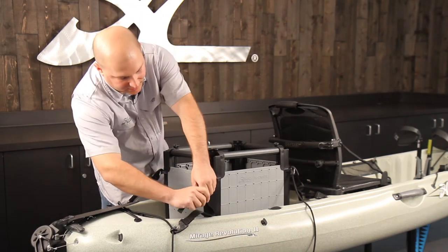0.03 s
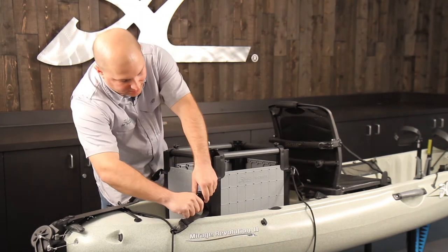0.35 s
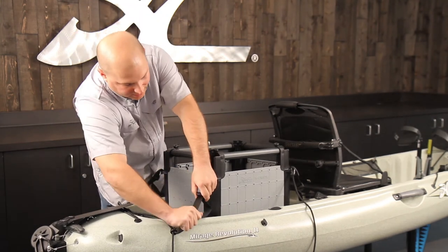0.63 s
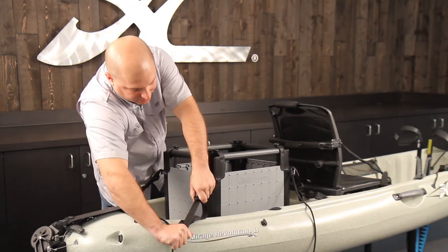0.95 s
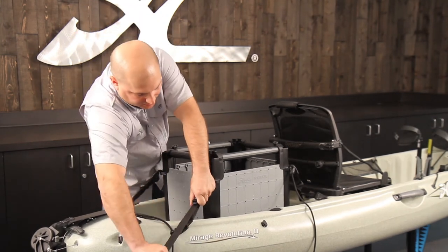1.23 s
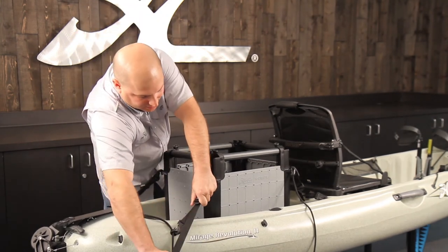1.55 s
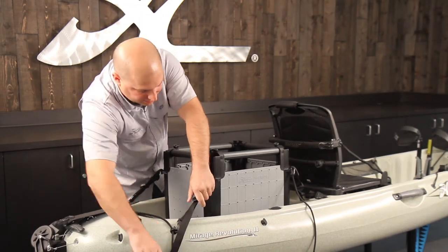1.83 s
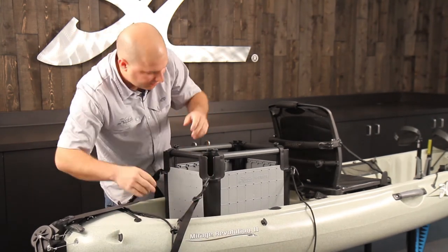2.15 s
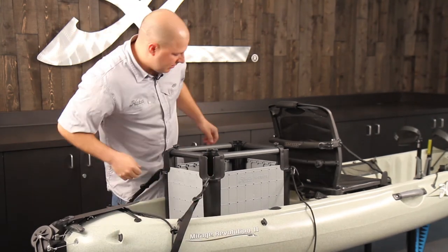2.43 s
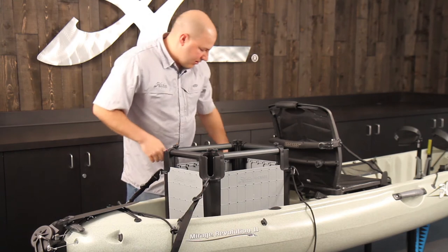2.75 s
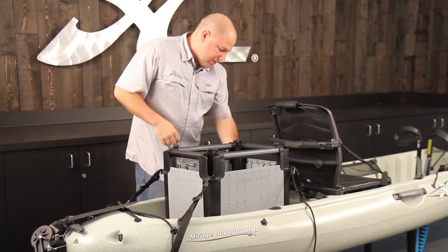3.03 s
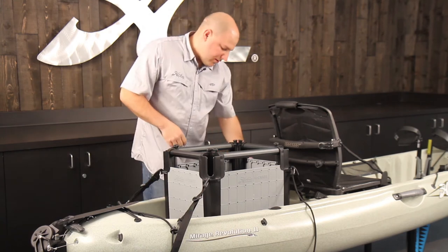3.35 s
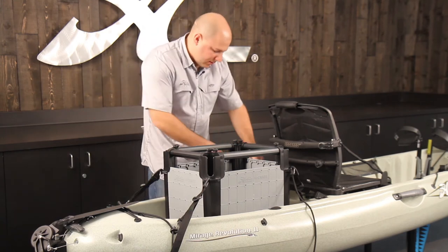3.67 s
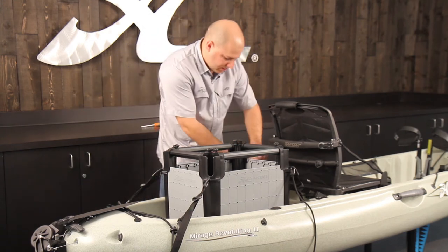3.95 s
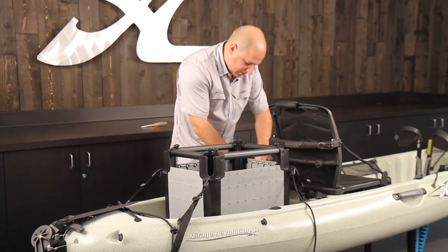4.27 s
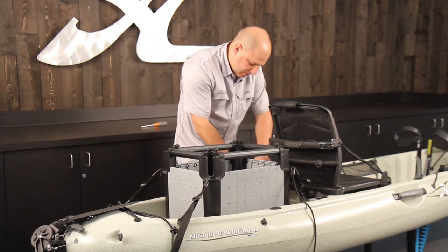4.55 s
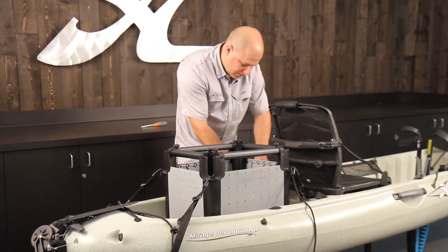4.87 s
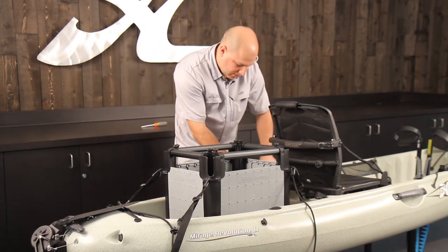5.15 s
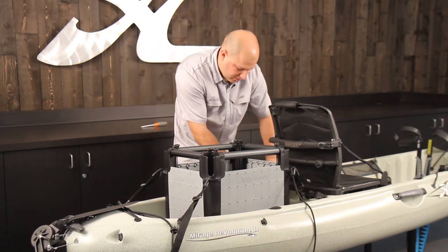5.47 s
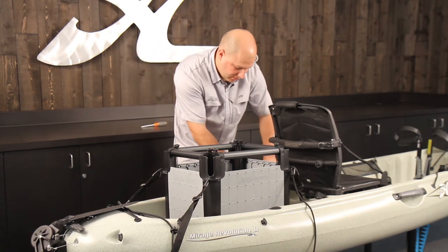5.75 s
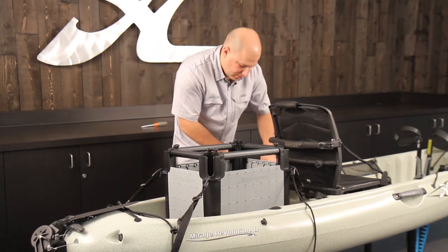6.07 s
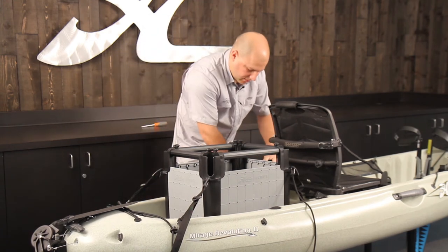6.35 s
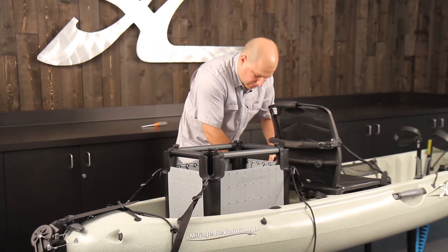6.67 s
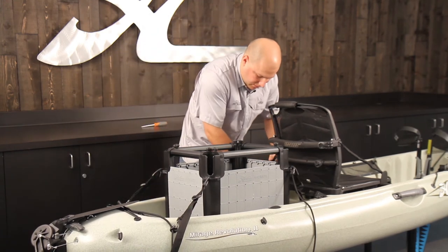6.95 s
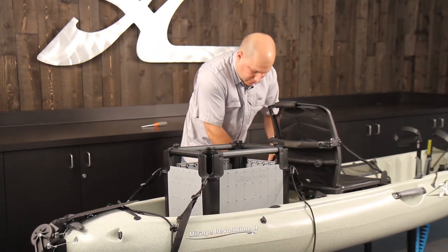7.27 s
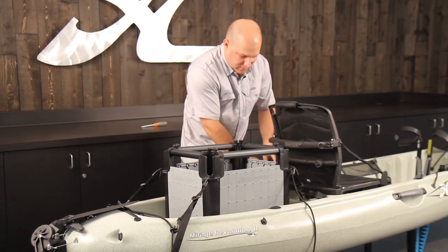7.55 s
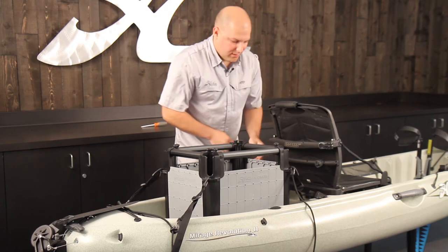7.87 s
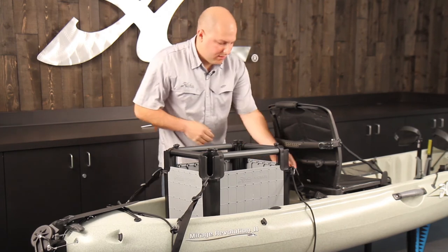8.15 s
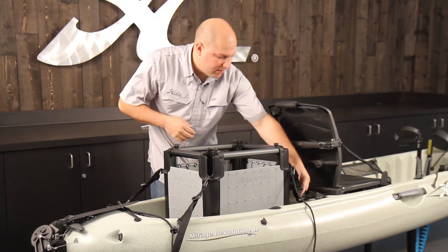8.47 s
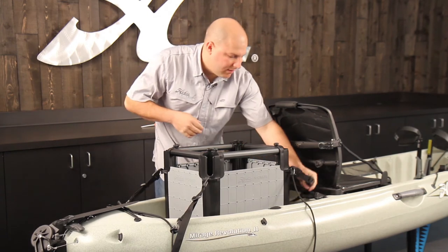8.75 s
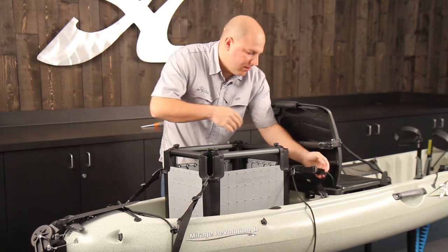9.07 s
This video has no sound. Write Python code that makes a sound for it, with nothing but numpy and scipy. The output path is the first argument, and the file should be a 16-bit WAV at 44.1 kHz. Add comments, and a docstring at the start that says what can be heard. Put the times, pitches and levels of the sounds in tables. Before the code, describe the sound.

Webbing straps rasp tight around a plastic crate on a hollow kayak, with knocks, dull drumming and one sharp clip snap.

```python
"""Strapping a crate to a kayak

Webbing catches and slips through its buckle, lashing a plastic crate to a hollow hull that drums
under the load. Hands knock the crate, snap a clip home, pull a second strap and rummage against
the hull. A shirt rustles close by; a quiet, ventilated workshop answers."""
import sys
import numpy as np
from scipy import signal
from scipy.fft import rfft, irfft, next_fast_len
from scipy.io import wavfile
from scipy.ndimage import uniform_filter1d, map_coordinates

SR = 44100
rng = np.random.default_rng(int(sys.argv[2]) if len(sys.argv) > 2 else 0)


def wav_out(sig):
    """Save sig, one row per channel (or a flat mono array), as 16-bit PCM at SR to the path in sys.argv[1]."""
    wavfile.write(sys.argv[1], SR, np.round(np.clip(np.atleast_2d(sig).T, -1, 1) * 32767).astype(np.int16))


N = 401743
LEAD_S = 0.2  # run-up of a stroke

# Resonances. Each row: centre in Hz, width in Hz, gain in dB.
HULL_MODES = [(34, 30, -6), (79, 12, 4), (125, 16, -3), (186, 30, -10), (247, 16, -3)]
BUCKLE_MODES = [(2112, 64, -8.5), (2670, 140, -1.5), (2970, 140, -2), (3580, 94, 3), (3920, 49, 0.5),
                (4330, 140, -2), (5300, 360, -3)]
# Spectrum of plucked webbing fibres. Each row: frequency in Hz, gain in dB.
FIBRE_SPECTRUM = [(1290, -26.5), (2200, -9), (3000, 0.5), (3950, 3), (5300, -3.5), (7100, -2), (9000, -6.5),
                  (11400, -11), (13300, -12.5), (15800, -8)]


def straps():
    """The weave catches and slips in the buckle: it rasps, hisses, shakes the hull and rings the crate."""
    # Each row: start in s, hold in s, full levels in dB of rasp, hull flex, hull wall, crate frame and
    # hiss, swell in dB, hiss swell in dB, release t60 in s, catches per s, catch depth in dB.
    pulls = [(0.73, 0.075, -39.5, -46, -29, -32, -48.5, 23, 4, 0.08, 180, 5.5),
             (1.052, 0.092, -44.5, -36.5, -36, -39.5, -45.5, 5.5, 10, 0.17, 110, 11),
             (4.853, 0.034, -57.5, -61, -74, -60, -66.5, 5.5, -5, 0.18, 120, 20),
             (4.934, 0.0029, -51, -67, -73, -48.5, -64, 9, -2, 0.079, 99, 3.5),
             (5.058, 0.018, -55, -67, -74, -57, -65, 4, -3, 0.16, 110, 14),
             (5.118, 0.069, -43, -44, -50, -35, -45, 2.5, 1, 0.12, 85, 4),
             (5.393, 0.028, -37.5, -48, -51, -41, -64, 16.5, -14.5, 0.066, 82, 8.5),
             (6.659, 0.036, -49.5, -58, -58, -50.5, -76, 2, 12, 0.098, 80, 0)]
    # Hull wall and crate frame. Each row: centre in Hz, width in Hz, gain in dB.
    wall_modes = [(186, 24, -6), (222, 16, -6), (246, 22, 3), (448, 26, -9), (530, 36, -2), (604, 30, -7)]
    frame_modes = [(335, 24, -12), (480, 22, -7), (530, 24, -5), (820, 26, -9), (885, 35, -5),
                   (953, 42, -1), (1035, 40, -8)]
    # Each row: frequency in Hz, gain in dB.
    rasp_spectrum = [(88, -11.5), (150, -4), (250, 5), (380, 4.5), (540, 12), (720, 8.5), (950, -7.5),
                     (1250, -12.5), (1450, -5), (2010, -20), (3000, -38), (3900, -23.5), (6600, -120)]
    attack_s = 0.0095
    rasp_gain, flex_gain, wall_gain, frame_gain, hiss_gain = np.zeros((5, N))
    for (start_s, hold_s, rasp_db, flex_db, wall_db, frame_db, hiss_db,
         swell_db, hiss_swell_db, t60_s, catches_per_s, catch_db) in pulls:
        catches = ratchet(catches_per_s, catch_db)
        crate_catches = unit(catches ** 0.8)  # the heavy crate follows less than the fibres do
        tension = stroke(hold_s, attack_s, t60_s, swell_db)
        at_s = start_s - LEAD_S
        add(rasp_gain, at_s, amp(rasp_db) * tension * crate_catches)
        add(flex_gain, at_s, amp(flex_db) * tension)
        add(wall_gain, at_s, amp(wall_db) * tension)
        add(frame_gain, at_s, amp(frame_db) * tension)
        add(hiss_gain, at_s, amp(hiss_db) * stroke(hold_s, attack_s, t60_s, hiss_swell_db) * catches)
    weave = slips(per_s=2000, spread_db=1)
    tugs = slips(per_s=3000, spread_db=1)
    plucks = weave + slips(per_s=4500, spread_db=0.5)  # each slip of the weave also plucks fibres
    fibres = unit(patchy(coloured(plucks, FIBRE_SPECTRUM), depth_db=2))
    hiss = unit(fibres + amp(-11) * unit(resonate(tugs, BUCKLE_MODES)))
    rasp = unit(coloured(weave, rasp_spectrum))
    flex = unit(band(slips(per_s=500, spread_db=2), 37, 600))  # coarse slips shake the hull's skin
    wall = unit(resonate(tugs, wall_modes))
    frame = unit(resonate(weave, frame_modes))
    return rasp_gain * rasp + flex_gain * flex + wall_gain * wall + frame_gain * frame + hiss_gain * hiss


def ratchet(per_s, depth_db):
    """Gain of ribs crossing the buckle's teeth: each lets go at once and fades until the next; rms 1."""
    spacing_s = np.exp(0.39 * rng.standard_normal(400)) / per_s
    ribs = np.interp(np.arange(SR) / SR, np.cumsum(spacing_s), np.arange(len(spacing_s)))
    return unit(amp(-depth_db * (ribs % 1)))


def clip_snap():
    """The clip springs home with a bright crack and rings briefly; its rail rings on faintly."""
    # Each row: start in s, level in dB.
    snaps = [(3.738, -10)]
    # Each row: frequency in Hz, gain in dB.
    crack_spectrum = [(120, -71.5), (200, -38.5), (322, -13), (447, -13.5), (517, -27), (610, -13.5),
                      (1180, -8), (1830, -18), (2680, -12.5), (2990, -4.5), (3730, -15), (4640, -18),
                      (8030, -35.5), (10000, -29.5), (15800, -55.5)]
    # Each row: frequency in Hz, gain in dB, t60 in s.
    clip_modes = [(462, 0, .08), (830, -10, .06), (915, -10, .07), (997, -8, .06), (1130, -7, .07),
                  (1207, -4, .07), (1350, -11, .08), (1620, -17, .05), (1900, -16, .04), (2120, -15, .05),
                  (2530, -13, .04), (2930, -5, .04), (3040, -8, .035), (3360, -14, .04)]
    rail_modes = [(283, -6, .25), (440, 3, .25), (530, -2, .25), (600, -3, .25), (915, -7, .31),
                  (1136, -5, .29), (1206, -6, .37), (1351, 2, .24), (1685, -12, .37), (2116, -16, .45),
                  (2410, -21, .35), (2545, -23, .3), (2910, -15, .35), (2975, -16, .3), (3774, -25, .39),
                  (3908, -11, .3), (4409, -23, .37), (4678, -21, .33), (5087, -23, .39)]
    attack_s, t60_s = 0.0025, 0.029
    out, t = np.zeros(N), np.arange(SR // 2) / SR
    for start_s, db in snaps:
        envelope = amp(-60 * t / t60_s) * (1 - np.exp(-t / attack_s))
        crack = amp(-16) * burst(coloured(rng.standard_normal(len(t)) * envelope, crack_spectrum))
        clip = amp(-12.5) * ringing(t, clip_modes)
        rail = amp(-26.5) * ringing(t, rail_modes)
        add(out, start_s, amp(db) * (crack + clip + rail))
    return out


def crate_knocks():
    """Buckles and hooks knock the crate, each spot at its own pitch; softer contacts lose more treble."""
    # Each row: start in s, clack level in dB, thud over clack in dB, softness as crack loss in dB,
    # chatter t60 in s, thud pitch in Hz, clack pitch in Hz.
    knocks = [(0.706, -37, -28, 16, .06, 550, 1140), (0.7128, -25.5, 0, 15, 0.043, 557, 1170),
              (0.797, -32.5, -16, 27, 0.058, 510, 1020), (0.809, -33, -2, 36, 0.037, 450, 1000),
              (0.8823, -31, -4.5, 17, 0.032, 534, 1250), (1.134, -33, 2.5, 28, 0.077, 500, 900),
              (1.595, -51, 2, 13, 0.13, 500, 1170), (2.485, -64, 15, -4, 0.023, 305, 1110),
              (2.783, -60.5, -7, 14, 0.23, 507, 1150), (3.028, -55.5, 2.5, 15, 0.7, 540, 1030),
              (3.136, -35.5, -5.5, 18.5, .15, 670, 1000), (3.202, -46, -2.5, 24, .19, 420, 1030),
              (3.230, -47, -6, 18, 0.38, 354, 1010), (3.254, -43.5, 0, 17.5, 0.071, 453, 950),
              (3.416, -54.5, -3.5, 10, 0.67, 600, 1180), (3.537, -41, 0.5, 25, 0.29, 580, 1160),
              (4.015, -34, -6, 29, 0.053, 505, 920), (4.083, -50.5, 6, 4.5, 0.052, 564, 1020),
              (4.22, -61.5, -1, 24.5, 0.046, 607, 1180), (4.928, -56, -1, 6.5, 0.12, 418, 970),
              (4.965, -56.5, 1, 6, .13, 410, 900), (5.098, -67, 2, -0.5, .057, 480, 1000),
              (5.123, -34, -4.5, 8.5, 0.19, 494, 960), (5.1745, -31, -14, 35, 0.076, 540, 890),
              (5.302, -32.5, -2, 7, 0.042, 566, 1200), (5.438, -37, -3, 17, 0.095, 673, 900),
              (5.628, -56, 5.5, 5.5, .011, 457, 1040), (5.941, -52.5, 0.5, 15, 0.19, 456, 880),
              (5.979, -55, 4.5, 22, 0.069, 544, 930), (6.057, -54.5, 7.5, 36, 0.12, 514, 942),
              (6.248, -37.5, -0.5, 20, 0.14, 542, 980), (6.297, -36, -1.5, 19, 0.14, 410, 1300),
              (6.662, -41, -3, 18.5, 0.12, 470, 1030), (6.675, -46, 5.5, 12.5, 0.11, 484, 1060),
              (7.386, -61.5, 21.5, 10, 0.04, 500, 820), (7.688, -62.5, 16.5, 11, 0.15, 310, 860),
              (8.149, -60, -17, 19, 0.12, 400, 1350), (8.43, -60, 5.5, 23, 0.13, 432, 930),
              (8.752, -43, 2, 12.5, .067, 677, 920), (8.79, -56.5, 4, 25, 0.035, 505, 840),
              (8.866, -57, 6.5, 7, .1, 398, 930), (8.914, -68, 15, 12, 0.04, 380, 900),
              (8.973, -58, 11, 22, 0.12, 490, 800), (9.096, -48, 6.5, 30, 0.12, 500, 920)]
    out, t = np.zeros(N), np.arange(SR // 4) / SR
    for start_s, db, panel_db, soft_db, t60_s, thud_hz, clack_hz in knocks:
        thud_db = db + panel_db
        boom_db = thud_db - 19  # little reaches the hull
        knock = contact(t, t60_s, thud_hz, clack_hz, boom_db, thud_db,
                        clack_db=db, crack_db=db - soft_db, tick_db=db - 1.7 * soft_db)
        add(out, start_s, knock)
    return out


def hull_bumps():
    """Hands and crate bump the hull: dull blows, mostly boom and thud."""
    # Each row: start in s, boom level in dB, chatter t60 in s.
    bumps = [(0.782, -46, 0.19), (1.043, -41, 0.16), (6.298, -45, 0.33), (6.779, -40.5, 0.2),
             (6.931, -39.5, 0.077), (6.966, -41, 0.091), (7.014, -43, 0.032), (7.037, -41.5, 0.17),
             (7.101, -40, 0.1), (7.247, -36, 0.12), (7.275, -40, 0.14)]
    out, t = np.zeros(N), np.arange(SR // 4) / SR
    for start_s, db, t60_s in bumps:
        bump = contact(t, t60_s, thud_hz=380, clack_hz=900, boom_db=db, thud_db=db - 1.5,
                       clack_db=db - 15, crack_db=db - 29.5, tick_db=db - 39.5)
        add(out, start_s, bump)
    return out


def contact(t, t60_s, thud_hz, clack_hz, boom_db, thud_db, clack_db, crack_db, tick_db):
    """One blow booms the hull, thuds the panels, clacks the frame, cracks and ticks at the hard edge."""
    # Each row: centre in Hz, width in Hz, gain in dB.
    crate_modes = [(270, 38, 5.5), (445.3, 37, 3.5), (571.6, 110, -0.5), (666, 99, 6), (791, 100, 4),
                   (939, 110, 5.5), (1040, 220, -3), (1372, 37, -3.5), (1810, 130, -23.5)]
    wide, narrow = 1.45, 1.45 ** 0.8  # ratios of band edge to pitch
    force = strike(t, t60_s, chatter=0.85)
    plastic = resonate(force, crate_modes) + amp(-12) * force
    hull = resonate(strike(t, t60_s, chatter=0.49), HULL_MODES)
    boom = amp(boom_db) * burst(band(hull, 120, 190))
    thud = amp(thud_db) * burst(band(plastic, thud_hz / wide, thud_hz * wide))
    # The touched spot radiates before the crate rings, sharply only if the chatter is short.
    spot = burst(band(1.0 * (t == 0), clack_hz / narrow, clack_hz * narrow, order=3))
    spot_gain = 1.4 * np.exp(-t60_s / 0.04)
    frame = burst(band(plastic, clack_hz / narrow, clack_hz * wide))
    clack = amp(clack_db) * burst(spot_gain * spot + frame)
    crack = amp(crack_db) * burst(band(strike(t, t60_s, chatter=0.85), 1600, 3400, order=3))
    tick = amp(tick_db) * burst(band(strike(t, 0.38 * t60_s, chatter=1.1), 3300, 10000))
    return boom + thud + clack + crack + tick


def hull_drumming():
    """The hollow hull drums as the load shifts on it; a stiffer spot drums higher."""
    # Each row: start in s, hold in s, relative level in dB, lowest flexing pitch in Hz.
    strains = [(0.478, 0.055, -61, 25), (0.728, 0.19, -41.5, 21), (1.064, 0.16, -32.5, 43),
               (1.256, 0.11, -30.5, 37), (1.604, 0.029, -43, 20), (2.35, 0.14, -61, 71),
               (2.647, 0.11, -57.5, 10), (4.637, 0.033, -58.5, 20), (4.878, .03, -51, 17),
               (4.946, 0.11, -41.5, 18), (5.164, 0.12, -38.5, 18), (5.388, 0.079, -43, 22),
               (5.561, 0.052, -47, 17), (6.808, 0.069, -49.5, 30), (6.996, 0.2, -46.5, 44),
               (7.272, 0.045, -39.5, 77), (7.478, 0.077, -55, 79)]
    out = np.zeros(N)
    for start_s, hold_s, db, low_hz in strains:
        top_hz = 109 + 2.7 * low_hz
        drum = unit(band(resonate(rng.standard_normal(SR), HULL_MODES), low_hz, top_hz, order=3))
        power = np.abs(uniform_filter1d(drum ** 2, size=2600))
        levelled = unit(drum / np.sqrt(power + 0.038))  # so the strain sets the loudness
        strain = amp(db - 6) * stroke(hold_s, attack_s=0.045, t60_s=0.46)
        add(out, start_s - LEAD_S, strain * levelled)
    return out


def scrapes():
    """Hands, hooks and webbing slide: slips swell and fade in the band of the surface crossed."""
    # Each row: crest time in s, rise in s, surface pitch in Hz, level in dB.
    slides = [(0.036, 0.0095, 5600, -57), (0.048, 0.12, 9620, -73), (0.22, 0.11, 4800, -76),
              (0.22, 0.022, 380, -63), (0.676, 0.014, 900, -51.5), (0.673, 0.0139, 4985, -58.5),
              (0.797, 0.034, 8000, -55.5), (0.802, 0.017, 1300, -43.5), (1.359, 0.036, 9420, -72),
              (1.5, 0.065, 7560, -66.5), (1.529, 0.054, 517, -55.5), (1.949, 0.02, 4330, -69),
              (3.429, 0.018, 11890, -65), (3.619, 0.089, 11590, -72.5), (3.99, 0.095, 688, -53),
              (4.147, 0.05, 5900, -69.5), (5.4, 0.022, 5270, -60.5), (5.822, 0.0465, 8800, -74),
              (6.268, 0.032, 5440, -70), (6.28, 0.05, 10880, -78), (6.343, 0.095, 830, -60.5),
              (6.387, 0.013, 3100, -60), (6.388, 0.012, 8600, -68), (6.499, 0.03, 484, -61.5),
              (6.682, 0.03, 970, -46.5), (6.7, .04, 11720, -82), (6.801, 0.047, 10730, -75.5),
              (6.97, 0.043, 11330, -73.5), (7.068, 0.076, 10750, -77.5), (7.23, 0.023, 11260, -81),
              (7.439, 0.017, 3850, -60.5), (7.439, 0.018, 7500, -63.5), (7.525, 0.028, 380, -56),
              (8.201, 0.28, 4970, -84.5), (8.43, 0.037, 477, -60), (8.619, 0.039, 334, -67.5),
              (8.756, 0.031, 700, -49), (9.1, 0.022, 720, -48)]
    width_octaves, fall_over_rise = 1.4, 0.9
    edge = 2 ** (width_octaves / 2)
    out, t = np.zeros(N), np.arange(-SR // 4, SR // 4) / SR
    for crest_s, rise_s, hz, db in slides:
        slope_s = np.where(t < 0, rise_s, fall_over_rise * rise_s)
        pressure = np.exp(-(t / slope_s) ** 2)
        grit = slips(per_s=2000, spread_db=4, size=len(t))
        add(out, crest_s + t[0], amp(db) * pressure * unit(band(grit, hz / edge, hz * edge, order=3)))
    return out


def creaks():
    """Taut webbing gives a little at a time, each slip a dry tick."""
    # Each row: start in s, level in dB.
    ticks = [(0.824, -66.5), (1.036, -56), (1.211, -77.5), (1.22, -59), (1.234, -60), (1.277, -62),
             (1.304, -64), (1.329, -63), (1.359, -61), (1.385, -74), (1.422, -80), (1.675, -73),
             (1.725, -65), (3.172, -68.5), (3.494, -66.5), (3.814, -62), (5.167, -50), (5.187, -56.5),
             (5.212, -51), (5.231, -58.5)]
    # Each row: frequency in Hz, gain in dB.
    tick_spectrum = [(500, -17.5), (1500, 0), (3800, -2), (6000, -5.5), (10000, -9), (15800, -15.5)]
    out, t = np.zeros(N), np.arange(SR // 8) / SR
    for start_s, db in ticks:
        slip = strike(t, t60_s=0.041, chatter=6.7)
        add(out, start_s, amp(db) * burst(coloured(slip, tick_spectrum)))
    return out


def chinks():
    """Buckles and hooks ring briefly; a gentler touch leaves out the upper modes."""
    # Each row: start in s, level in dB, chatter t60 in s, upper edge in Hz.
    touches = [(0.714, -55, .012, 2760), (0.882, -66, 0.01, 3340), (1.596, -57, 0.013, 3300),
               (3.126, -58.5, 0.02, 5470), (3.137, -58, 0.0087, 6000), (3.203, -69, .015, 5500),
               (3.253, -58.5, 0.0097, 6000), (3.356, -62.5, 0.027, 5250), (3.414, -59, 0.076, 6000),
               (3.605, -64, .02, 5500), (3.638, -63, .015, 5580), (5.097, -52.5, 0.0092, 4460),
               (6.246, -57, 0.012, 2854), (6.298, -55, 0.014, 4400), (5.626, -59.5, .012, 5560),
               (6.39, -64, .025, 4060), (6.933, -67.5, 0.023, 3640), (6.964, -75, 0.024, 3570),
               (7.055, -70, 0.026, 3770), (7.099, -70, 0.018, 3540), (7.275, -75.5, 0.023, 3167),
               (8.753, -56, 0.012, 4756), (9.0, -70, 0.044, 2950)]
    out, t = np.zeros(N), np.arange(SR // 4) / SR
    for start_s, db, t60_s, top_hz in touches:
        ring = resonate(strike(t, t60_s, chatter=1.2), BUCKLE_MODES)
        add(out, start_s, amp(db) * burst(band(ring, 1600, top_hz, order=3)))
    return out


def handling():
    """As the arms move, the shirt rustles, webbing crackles and palms brush or rub the plastic."""
    # Briskness of the arms. Each row: time in s, level in dB.
    arm_motion = [(0.0, -75), (0.42, -80), (0.89, -65), (1.22, -68), (1.799, -71.5), (2.1, -75),
                  (2.35, -69), (2.68, -74), (2.95, -75.5), (3.2, -70.5), (3.959, -67.5), (4.439, -81.5),
                  (4.801, -85), (5.07, -76.5), (5.3, -66), (5.56, -80), (6.1, -83), (6.4, -72.5),
                  (6.6, -78.5), (7.001, -78), (7.6, -81), (8.101, -77.5), (8.649, -82.5), (8.91, -69.5),
                  (9.11, -72)]
    # Each row: start in s, hold in s, level in dB.
    hard_rubs = [(0.0, 0.032, -63.5), (1.316, 0.064, -58), (1.555, 0.16, -67), (5.187, 0.1, -47.5),
                 (5.5, 0.032, -53), (5.901, 0.15, -65.5), (6.366, 0.78, -67), (6.803, 0.029, -54.5),
                 (7.006, 0.034, -52), (7.247, 0.037, -53.5), (8.865, 0.057, -57)]
    # Each row: frequency in Hz, gain in dB.
    palm_spectrum = [(76, -32), (130, 1), (241, -4), (276, -1.5), (309, -3), (588, -4), (831, -10.5),
                     (964, -11), (1520, -26.5), (2500, -41), (3250, -59.5), (5500, -120)]
    shirt_spectrum = [(650, -40.5), (1100, 1), (1180, -2), (1360, 2.5), (3320, -5), (5180, -3),
                      (6920, -10.5), (13200, -13), (15800, -14)]
    motion = amp(np.interp(np.arange(N) / SR, *np.transpose(arm_motion)))
    palm_gain = motion.copy()
    for start_s, hold_s, db in hard_rubs:
        add(palm_gain, start_s - LEAD_S, amp(db) * stroke(hold_s, attack_s=0.046, t60_s=0.42))
    pressure = amp(1.8 * wobble(knots_per_s=30))
    palm = unit(coloured(slips(per_s=1500, spread_db=1.5), palm_spectrum) * pressure)
    flutter = amp(1.2 * wobble(knots_per_s=39))
    cloth = coloured(slips(per_s=9000, spread_db=0.5), shirt_spectrum)
    shirt = amp(-0.5) * unit(patchy(cloth, depth_db=4) * flutter)
    crackle = amp(-23.5) * unit(coloured(slips(per_s=150, spread_db=5), FIBRE_SPECTRUM))
    return palm_gain * palm + motion * (shirt + crackle)


def room(x):
    """The walls answer x; higher frequencies die sooner."""
    # Each row: frequency in Hz, t60 in s.
    decay_times = [(80, 1), (500, 0.58), (1200, 0.36), (3000, 0.23), (6000, 0.15), (14000, 0.095)]
    predelay_s = 0.0053
    hz, t, noise = signal.stft(rng.standard_normal(SR * 3 // 4), SR, nperseg=256)
    decay = amp(-60 * t / along(decay_times, hz)[:, None])
    tail = signal.istft(noise * decay, SR, nperseg=256)[1]
    tail = np.pad(tail / np.linalg.norm(tail), (round(predelay_s * SR), 0))
    return signal.fftconvolve(x, tail)[:N]


def ventilation():
    """Steady air noise and hiss with a fan's faint whine."""
    # One row: centre in Hz, width in Hz, level in dB.
    fan_whine = (955, 45, -83)
    # Each row: frequency in Hz, gain in dB.
    air_spectrum = [(12, -35.5), (20, 6), (48, -0.5), (137, -5), (386, -15), (469, -10.5), (554, -26),
                    (942, -15), (1150, -23), (1430, -34.5), (3220, -31), (5170, -35.5), (11600, -40),
                    (12600, -56), (15800, -63.5)]
    hz, width_hz, db = fan_whine
    whine = amp(db) * unit(resonate(rng.standard_normal(N), [(hz, width_hz, 0)]))
    return whine + amp(-70) * unit(coloured(rng.standard_normal(N), air_spectrum))


def stroke(hold_s, attack_s, t60_s, swell_db=0):
    """Gain of one effort, from LEAD_S before its start: sets in, swells to 1 while held, dies away."""
    t = np.arange(SR) / SR - LEAD_S
    onset = np.exp(-(np.minimum(t, 0) / attack_s) ** 2)
    to_go = 1 - np.clip(t / hold_s, 0, 1)
    release_db = 60 * np.maximum(t - hold_s, 0) / t60_s
    return onset * amp(-swell_db * to_go - release_db)


def slips(per_s, spread_db, size=N):
    """Tiny stick-slip releases of random time and size; rms 1."""
    heights = rng.standard_normal(size) * amp(spread_db * rng.standard_normal(size).clip(-2, 2))
    return unit((rng.random(size) < per_s / SR) * heights)


def strike(t, t60_s, chatter):
    """One sharp contact, then loose parts chatter to rest; longer chatter carries more energy."""
    bounces = rng.standard_normal(len(t)) * amp(-60 * t / t60_s) * (1 - np.exp(-t / 0.001))
    return burst(1.0 * (t == 0)) + chatter * np.sqrt(t60_s / 0.06) * burst(bounces)


def ringing(t, modes):
    """Struck modes, each building up over two cycles."""
    out = np.zeros(len(t))
    for hz, db, t60_s in modes:
        envelope = amp(db - 60 * t / t60_s) * (1 - np.exp(-hz * t / 2))
        out += envelope * np.sin(2 * np.pi * (hz * t + rng.random()))
    return burst(out)


def resonate(x, modes):
    """x through a body's resonances, alternating in sign."""
    def response(f):
        return sum((-1) ** k * amp(db) * 1j * f * width_hz / (hz * hz - f * f + 1j * f * width_hz)
                   for k, (hz, width_hz, db) in enumerate(modes))
    return filtered(x, response)


def coloured(x, spectrum, size=4096):
    """x through a minimum-phase filter with the given spectrum."""
    gain = amp(along(spectrum, np.fft.rfftfreq(size, 1 / SR)))
    cepstrum = irfft(np.log(gain + 1e-6))
    cepstrum[1:size // 2] *= 2
    cepstrum[size // 2 + 1:] = 0
    return signal.fftconvolve(x, irfft(np.exp(rfft(cepstrum))))[:len(x)]


def patchy(x, depth_db):
    """x with patches of gain drifting in time and frequency."""
    bins = signal.stft(x, nperseg=512)[2]
    patches = uniform_filter1d(rng.standard_normal(bins.shape), size=18, axis=0)
    patches = uniform_filter1d(patches, size=7, axis=1)
    return signal.istft(bins * amp(depth_db * unit(patches)), nperseg=512)[1][:N]


def band(x, low_hz, top_hz, order=2):
    """Causal band-pass."""
    return signal.sosfilt(signal.butter(order, [low_hz, top_hz], "band", fs=SR, output="sos"), x)


def filtered(x, response):
    """x through a complex response, a function of Hz."""
    size = next_fast_len(len(x) + SR // 4)
    return irfft(rfft(x, size) * response(np.fft.rfftfreq(size, 1 / SR)), size)[:len(x)]


def wobble(knots_per_s):
    """Smooth random curve."""
    knots = rng.standard_normal(int(N * knots_per_s / SR) + 4)
    return map_coordinates(knots, [np.arange(N) * knots_per_s / SR])


def along(points, hz):
    """Interpolate (Hz, value) points on a log axis."""
    point_hz, values = np.transpose(points)
    return np.interp(np.log(hz + 1), np.log(point_hz + 1), values)


def add(out, start_s, x):
    """Mix x into out from start_s on."""
    first = round(start_s * SR)
    part = x[max(-first, 0):max(len(out) - first, 0)]
    out[max(first, 0):][:len(part)] += part


def amp(db):
    """Decibels to gain."""
    return 10 ** (np.asarray(db) / 20)


def unit(x):
    """Scale to rms 1."""
    return x / np.sqrt(np.mean(x ** 2) + 1e-20)


def burst(x):
    """Scale to the energy of 10 ms at rms 1."""
    return x / np.sqrt(np.sum(x ** 2) / (SR / 100) + 1e-20)


def scene():
    blows = crate_knocks() + hull_bumps() + chinks()
    friction = straps() + scrapes() + creaks()
    clip = clip_snap()
    reverb = room(amp(-17.5) * blows + amp(-15) * friction + amp(-21) * band(clip, 400, 10000))
    return (blows + clip + friction + reverb + hull_drumming() + handling() + ventilation())[None]


def record(dry):
    """Brick-wall low-pass."""
    return np.array([filtered(channel, lambda hz: hz < 15900) for channel in dry])


dry = scene()
out = record(dry)
wav_out(out)
```